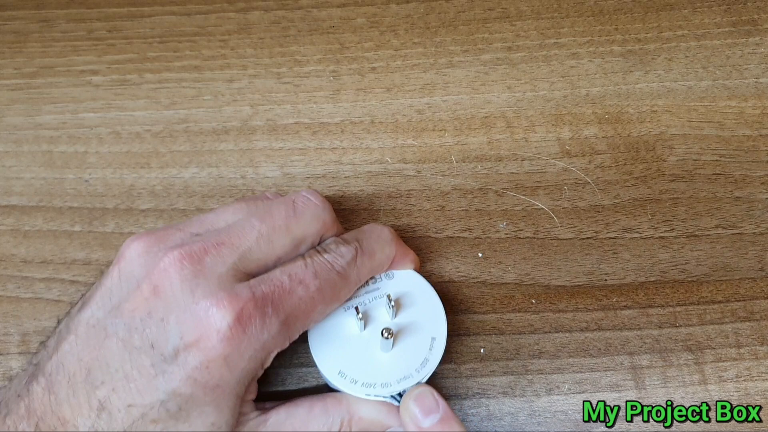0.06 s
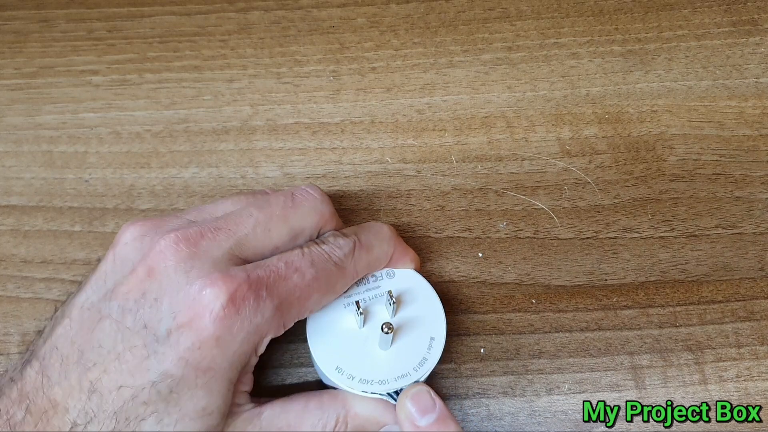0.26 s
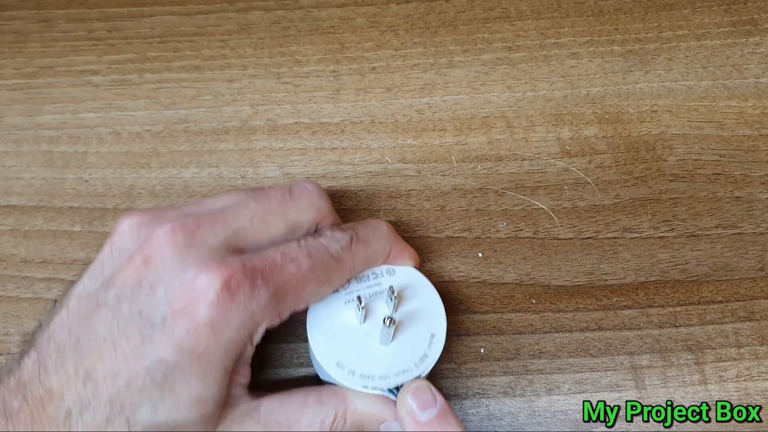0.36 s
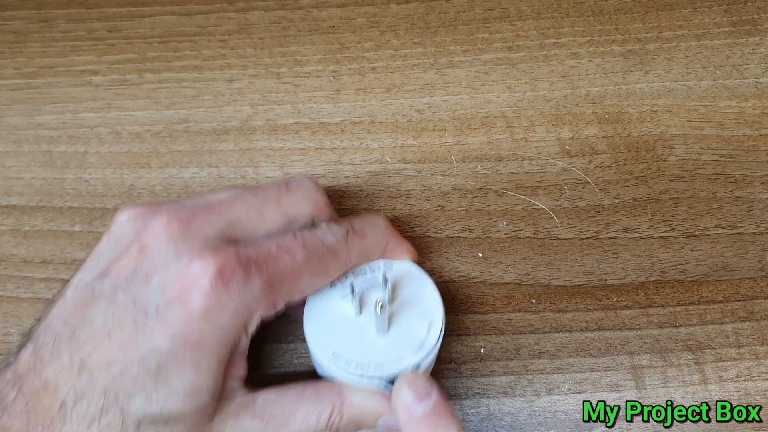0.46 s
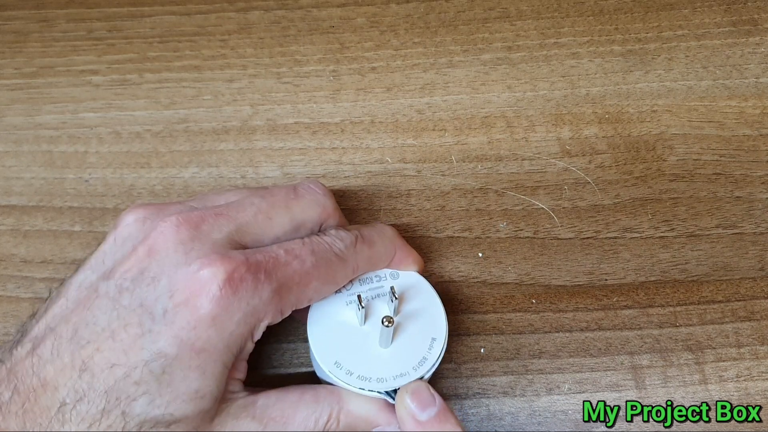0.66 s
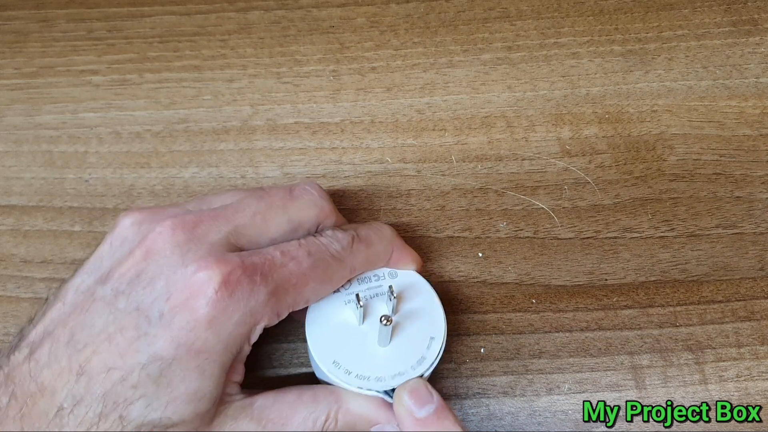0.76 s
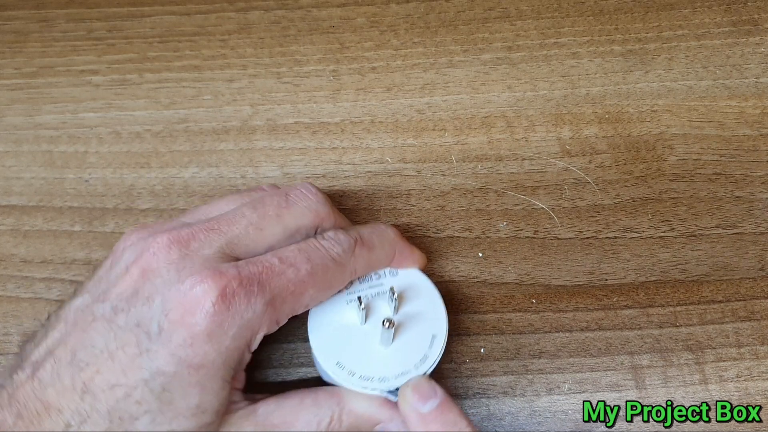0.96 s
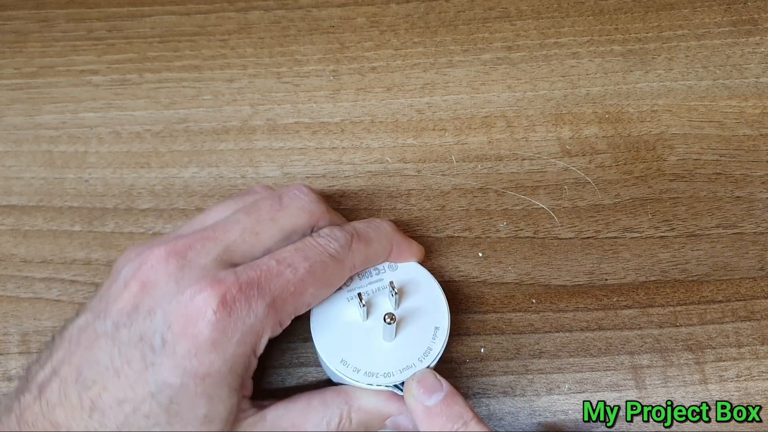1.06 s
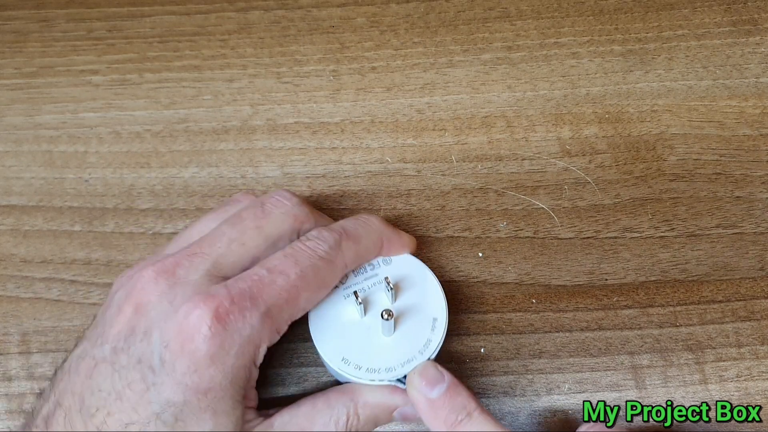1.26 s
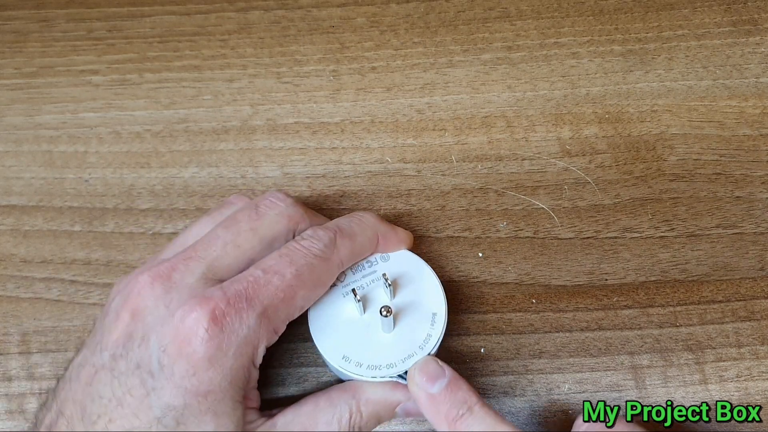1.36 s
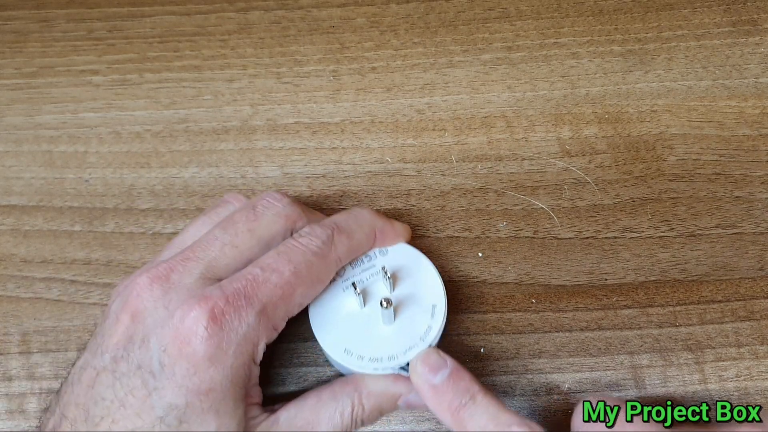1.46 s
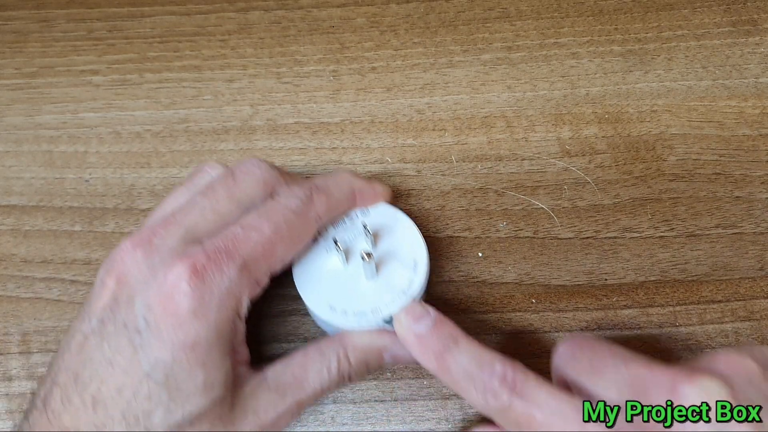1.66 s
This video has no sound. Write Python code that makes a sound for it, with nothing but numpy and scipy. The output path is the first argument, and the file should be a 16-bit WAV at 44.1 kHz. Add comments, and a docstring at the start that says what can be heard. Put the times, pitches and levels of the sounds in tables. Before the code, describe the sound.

Sharp, loud crack of a hard plastic case popping apart, followed by soft clicks and rubbing.

```python
"""Prying open a plastic case

A round plastic case is pried open with a small screwdriver on a wooden desk, in a small live room.
A catch lets go in a quick run of sharp snaps: bursts of noise, coloured by the shell, desk and room.
Then the blade and fingers knock, tick and scrape softly: short filtered bursts, fading tones and noise.
Under it lie a low room rumble and a faint hiss, both made of filtered noise."""
import sys
import numpy as np
from scipy import signal
from scipy.fft import rfft, irfft, next_fast_len
from scipy.io import wavfile
from scipy.ndimage import map_coordinates

SR = 44100
rng = np.random.default_rng(int(sys.argv[2]) if len(sys.argv) > 2 else 0)


def unload_audio(sound):
    """Save the sound as a 16-bit wav file, at the path given as the first command line argument."""
    columns = np.transpose(np.atleast_2d(sound))
    # keep every value between -1 and 1, then stretch to whole-number steps
    steps = np.round(np.clip(columns, -1, 1) * 32767)
    wavfile.write(sys.argv[1], SR, steps.astype(np.int16))


N = 74970
T = np.arange(N) / SR  # time in s
M = next_fast_len(2 * N)  # filter length, with space so that tails do not wrap around
HZ = np.fft.rfftfreq(M, 1 / SR)

# Levels of snaps, clicks and ticks are relative: their functions add level_db. Colours are relative too.
# the catch breaks free: start_s, level_db, bass_cut_hz, tearing_t60_s (t60: time to fade by 60 dB)
SNAP_EVENTS = [(0.2029, 2.5, 465, 0.017), (0.2182, 5, 200.9, 0.02), (.2202, 0, 330, 0.014)]
# broad colour of a snap: pitch_hz, level_db
SNAP_TONE = [(40, -9.5), (150, 0), (240, -5.5), (400, -5), (620, 3), (1000, -1.5), (1400, 6.5), (1650, -8),
             (2200, -1.5), (4500, -0.5), (6800, -3), (9000, -5.5), (11500, -3.5), (15000, -14)]
# resonances of the shell: pitch_hz, width_hz, level_db
SHELL_RESONANCES = [(321, 82, 10), (572, 100, 11.5), (920, 140, 9.5), (1195, 82, 6.5), (2735, 220, 1),
                    (3310, 90, 3), (6600, 320, 1), (7055, 120, 3.5), (11460, 290, -2)]
# desk and room ring on after a snap: pitch_hz, level_db, t60_s
DESK_MODES = [(56, -43, .55), (79, -39, .5), (120, -39, .28), (155, -27, .28), (303, -31, .22),
              (430, -38, .28), (548, -40, .28), (573, -37, .28), (715, -37, .25), (815, -39, .24),
              (891, -37, .22), (958, -33, .25), (1038, -39, .25), (1232, -37, .3)]
# dull knocks of blade and fingers: start_s, click_db, brightness_hz, thud_db, thud_start_hz,
# pitch_rise_share, thud_t60_s, desk_bump_db
KNOCK_EVENTS = [(0.123, -43.5, 464, -58.5, 333, 0.22, 0.1, -41.5),
                (0.4656, -42.5, 1155, -48.5, 330, 0.028, 0.05, -46),
                (0.6686, -45, 3610, -53.5, 337, -0.037, 0.08, -47),
                (0.6998, -22, 2620, -38, 321.5, 0.57, 0.1, -46),
                (0.7718, -37.5, 2860, -56, 348, -0.26, 0.087, -51),
                (0.828, -46, 940, -51.5, 315, 0, 0.054, -44.5),
                (1.202, -31.5, 1220, -37, 519, 0, 0.068, -38.5),
                (1.222, -26, 708, -42, 587.5, -0.233, 0.067, -39),
                (1.338, -34.5, 1610, -51.5, 524.4, 0, 0.25, -59),
                (1.369, -47.5, 820, -60, 462, 0.17, 0.31, -43),
                (1.565, -34.5, 2180, -51, 540, 0.067, 0.18, -51.5),
                (1.577, -38, 2080, -52.5, 661, 0.015, 0.11, -63)]
# colour of the clicks: pitch_hz, level_db
KNOCK_TONE = [(60, -3), (200, 7), (550, 14), (900, 12), (1350, 12.5), (1800, -2), (3000, 3), (12000, -26.5)]
# tones of the held shell: multiple_of_thud_pitch, level_db
THUD_TONES = [(.76, -10), (1, 0), (1.3, -5)]
# the blade taps the rim: start_s, level_db
RIM_TAP_EVENTS = [(1.2035, -57), (1.566, -54), (1.629, -61)]
# ringing of the rim: pitch_hz, level_db, t60_s
RIM_TONES = [(737.5, -2.5, 0.11), (1396, -5, 0.17), (1487, -6.5, 0.13), (2300, -11, 0.081)]
# thin ticks of the blade's tip: start_s, level_db, pitch_hz, t60_s
TICK_EVENTS = [(1.3385, -41, 6260, 0.0079), (1.6633, -35.5, 11560, 0.04)]
# the blade slides in the seam: peak_s, level_db, rise_s, fall_s (each a change of about 17 dB)
SCRAPE_EVENTS = [(1.365, -52, 0.045, 0.12)]
# colour of the scrape: pitch_hz, level_db
SCRAPE_TONE = [(100, -39), (350, 2), (540, 13.5), (900, -2), (1700, -49), (4500, -24), (11000, -26),
               (15000, -60)]
# fingers shift their grip and rub along the shell: time_s, level_db
RUB_LEVELS = [(.88, -80), (1.04, -70), (1.18, -68), (1.3, -66), (1.41, -60.5), (1.51, -67), (1.7, -64.5)]
# colour of the rubbing: pitch_hz, level_db
RUB_TONE = [(100, -13.5), (330, 5), (700, -6), (1050, 2), (1400, -5.5), (1700, -22), (2600, -9),
            (3600, -22.5), (4500, -17), (5600, -28.5), (6600, -16), (8000, -29), (11000, -28), (15000, -49)]
# dull handling noise while the hands work the case: time_s, level_db
GRIP_LEVELS = [(.66, -84), (.68, -64), (.8, -70), (1.0, -69), (1.3, -68), (1.7, -70)]
# colour of the handling noise: pitch_hz, level_db
GRIP_TONE = [(60, -16), (160, -10), (300, -15.5), (480, -14.5), (750, -18.5), (1200, -8), (1650, -14.5),
             (9000, -39.5)]
# level of the low room rumble: time_s, level_db
RUMBLE_LEVELS = [(.35, -55), (.5, -60), (.88, -55.5), (1.0, -64), (1.45, -55.5), (1.7, -62)]
# colour of the rumble: pitch_hz, level_db
RUMBLE_TONE = [(20, -19), (40, -6), (65, 0), (105, -13), (300, -27), (2000, -80)]
# colour of the faint hiss: pitch_hz, level_db
HISS_TONE = [(300, -2.5), (600, -14.5), (2000, -16.5), (15000, -33.5)]
# how long the room rings: pitch_hz, t60_s
ROOM_FADES = [(100, 0.2), (500, 0.29), (1500, 0.28), (4000, 0.27), (8000, 0.27), (14000, 0.16)]
# colour of the room: pitch_hz, level_db
ROOM_TONE = [(60, -1.5), (250, -4), (900, -4.5), (2500, -2), (7000, -5), (14000, 1)]
# how alike noise is on the two sides: pitch_hz, likeness (1 is the same, 0 unrelated)
SIDE_LIKENESS = [(100, .97), (300, .88), (600, .45), (1200, 0), (2500, 0)]

BEFORE_SNAP_S, BEFORE_SNAP_DB = .0015, -26  # a faint short burst of noise just before each snap
KNOCK_WET_DB, THUD_WET_DB = -9, -15  # share of the room
THUD_BEND_S = 0.0214  # the shell stiffens or slackens under the fingers in this time
BUMP_HZ, BUMP_T60_S = 183, 0.056  # the desk under a knock
ECHO_DB = -59.5  # the room still ringing as the scene opens
EARLY_COUNT, EARLY_SPAN_S, EARLY_DB = 14, .014, -8.5  # echoes off the desk, hands and tripod
TAIL_SWELL_S = 0.03  # the tail after a sound swells in over about this time
LEFT_LEAD_S, LEFT_DB = .00006, -0.07  # LEFT_DB: left by this, right by its opposite
TOP_HZ = 15900  # little is kept above this pitch


def snaps(level_db=8, wet_db=-1.0, grit=3):
    """A faint short burst of noise, then a tearing burst through the shell, with an even room tail."""
    power = amp(along(SNAP_TONE)) ** 2
    for hz, width, db in SHELL_RESONANCES:
        power = power + amp(db) ** 2 / (1 + (2 * (HZ - hz) / width) ** 2)
    out = np.zeros((2, N))
    for s, db, cut_hz, t60 in SNAP_EVENTS:
        bass_cut = HZ ** 2 / (HZ ** 2 + cut_hz ** 2)
        colour = amp(db + level_db) * causal(np.sqrt(power) * bass_cut)
        tear = at(s, burst(t60, grit))
        lead_in = amp(BEFORE_SNAP_DB) * at(s - BEFORE_SNAP_S, burst(t60, grit))
        direct = near(filtered(tear + lead_in, colour))
        # the room gathers all directions, so it gets one clean push without the grit
        clean_push = at(s, irfft(colour, M)[:N])
        out += direct + amp(wet_db) * room(clean_push)
    return out


def desk(attack_s=0.00307, spread=.25):
    """The hardest snap jolts the desk; its higher modes reach the two sides out of step."""
    hardest_s = max(SNAP_EVENTS, key=lambda row: row[1])[0]
    ring = np.zeros((2, N))
    for hz, db, t60 in DESK_MODES:
        phase = spread * hz / 500 * rng.standard_normal((2, 1))
        ring += amp(db) * fade(T, t60) * np.sin(2 * np.pi * hz * T + phase)
    return at(hardest_s, ring * (1 - np.exp(-T / attack_s)))


def knocks(level_db=8, grit=1.8, click_t60_s=0.045, attack_s=.002):
    """Soft contacts: a dulled click, a thud of the held shell that bends with the grip, a desk bump."""
    clicks, thuds = np.zeros((2, N)), np.zeros(N)
    for s, db, bright_hz, thud_db, thud_hz, rise, t60, bump_db in KNOCK_EVENTS:
        dulling = np.sqrt(1 + (HZ / bright_hz) ** 6)
        colour = causal(amp(along(KNOCK_TONE)) / dulling)
        clicks += at(s, amp(db + level_db) * filtered(burst(click_t60_s, grit), colour))

        pitch_hz = thud_hz * (1 + rise * (1 - np.exp(-T / THUD_BEND_S)))
        cycles = np.cumsum(pitch_hz) / SR
        thud = np.zeros(N)
        for multiple, mode_db in THUD_TONES:
            thud += amp(thud_db + mode_db) * np.sin(2 * np.pi * (multiple * cycles + rng.random()))

        bump_hz = BUMP_HZ * np.exp(rng.normal(0, 0.063))  # a little different each time
        bump = amp(bump_db) * np.sin(2 * np.pi * bump_hz * T)
        body = thud * fade(T, t60) + bump * fade(T, BUMP_T60_S)
        thuds += at(s, body * (1 - np.exp(-T / attack_s)))
    return in_room(clicks, KNOCK_WET_DB) + in_room(thuds, THUD_WET_DB)


def rim():
    """Each tap rings the same few modes of the loosened rim."""
    ring = np.zeros(N)
    for s, db in RIM_TAP_EVENTS:
        for hz, mode_db, t60 in RIM_TONES:
            ring += at(s, amp(db + mode_db) * fade(T, t60) * np.sin(2 * np.pi * hz * T))
    return in_room(ring, KNOCK_WET_DB)


def ticks(level_db=8, width=0.11, wet_db=-2):
    """The steel tip catches on the rim: a burst through a narrow peak around one pitch."""
    out = np.zeros((2, N))
    for s, db, hz, t60 in TICK_EVENTS:
        peak = 1 / np.hypot(1, (HZ / hz - 1) / width)
        bass_cut = HZ / (HZ + hz) * 2
        out += at(s, amp(db + level_db) * filtered(burst(t60, grit=5.6), causal(bass_cut * peak)))
    return in_room(out, wet_db)


def scrapes(rough_db=2, slips_per_s=160):
    """The sliding blade makes uneven friction noise that swells and dies away."""
    stroke = np.zeros(N)
    for s, db, rise, fall in SCRAPE_EVENTS:
        stroke += amp(db) * np.exp(-np.maximum((s - T) / rise, (T - s) / fall) * 2)
    return stroke * unit(diffuse(SCRAPE_TONE) * amp(rough_db * wobble(slips_per_s)))


def rub(levels, colour, rough_db, slips_per_s):
    """Skin shifts and slides on smooth plastic: noise with an uneven level."""
    level_db = np.interp(T, *np.transpose(levels), left=-120)  # almost silent before the first point
    return amp(level_db) * unit(diffuse(colour) * amp(rough_db * wobble(slips_per_s)))


def background(echo_t60=0.24, hiss_db=-76):
    """A rumble that swells and sinks, a steady faint hiss, and the end of a bright echo in the room."""
    echo_tone = [(200, 3.5), (1200, 3.5), (2000, -1.5), (11000, -0.5), (15000, -14.0)]  # pitch_hz, level_db
    echo = diffuse(echo_tone) * fade(T, echo_t60)
    rumble = amp(np.interp(T, *np.transpose(RUMBLE_LEVELS))) * diffuse(RUMBLE_TONE)
    return rumble + amp(hiss_db) * diffuse(HISS_TONE) + amp(ECHO_DB) * echo


def in_room(x, wet_db):
    """A sound on the desk with its share of the room."""
    return near(x) + amp(wet_db) * room(x)


def near(x):
    """The direct sound, reaching the left side slightly first, and a few near echoes."""
    delays = (.002 + EARLY_SPAN_S * rng.random((2, EARLY_COUNT))) * SR
    early = [np.bincount(d.astype(int), rng.choice([-1, 1], EARLY_COUNT), N) for d in delays]
    early = np.array(early) / np.sqrt(EARLY_COUNT)
    sides = np.array([[1], [-1]])  # left, right
    direct = np.exp(1j * np.pi * HZ * LEFT_LEAD_S * sides)
    echoes = amp(EARLY_DB) * rfft(early, M) * HZ / (HZ + 400)  # thinner in the bass
    return amp(LEFT_DB * sides) * filtered(x, direct + echoes)


def room(x):
    """The tail after a sound swells in over about 30 ms, as if a limiter recovers, then dies."""
    hz, t, z = signal.stft(diffuse([(100, 0.008), (10000, 0.0067)]), SR, nperseg=256)
    z = z * fade(t, along(ROOM_FADES, hz)[:, None])  # each pitch dies at its own speed
    tail = signal.istft(z, SR, nperseg=256)[1][:, :N]
    swell = 1 - np.exp(-(T / TAIL_SWELL_S) ** 2)
    tail = unit(tail * swell) / np.sqrt(N)
    return filtered(x, amp(along(ROOM_TONE)) * rfft(tail, M))


def burst(t60, grit):
    """A contact of about unit energy: one push, and dying grit that scatters differently to each side."""
    x = diffuse([(100, 0.003), (10000, 0.0059)]) * fade(T, t60)
    x = grit * x / np.sqrt(np.sum(x ** 2) / 2)
    x[:, 0] += 1  # the push
    return x / np.sqrt(1 + grit ** 2)


def diffuse(colour):
    """Stereo noise, alike in the bass and unrelated in the treble."""
    turn = np.arccos(np.clip(along(SIDE_LIKENESS), -1, 1)) / 2
    shares = np.array([np.cos(turn), np.sin(turn)])
    mid, side = filtered(rng.standard_normal((2, N)), amp(along(colour)) * shares)
    return unit(np.array([mid + side, mid - side]))


def wobble(rate):
    """A smooth curve through random points, rate points a second."""
    return map_coordinates(rng.standard_normal(N // 10), [T * rate], mode="wrap")


def amp(db):
    """Decibels to gain."""
    return 10 ** (np.asarray(db) / 20)


def unit(x):
    """Scale to an rms (average strength) of 1."""
    return x / np.sqrt(np.mean(x ** 2) + 1e-20)


def along(points, hz=HZ):
    """Read a curve of (pitch_hz, value) points on a log pitch axis."""
    f, v = np.transpose(points)
    return np.interp(np.log(hz + 1), np.log(f + 1), v)


def fade(t, t60):
    """Exponential decay, by 60 dB in t60 seconds."""
    return np.exp(-np.log(1000) * t / t60)


def filtered(x, response):
    """x shaped by a frequency response."""
    return irfft(rfft(x, M) * response, M)[..., :N]


def causal(gain):
    """The minimum-phase response with this gain: it rings only after a push, never before."""
    c = irfft(np.log(np.maximum(gain, 1e-6)), M)
    c[1:M // 2] *= 2
    c[M // 2 + 1:] = 0
    return np.exp(rfft(c))


def at(s, x):
    """x delayed to start at s seconds."""
    delay = max(round(s * SR), 0)
    return np.pad(x, [(0, 0)] * (x.ndim - 1) + [(delay, 0)])[..., :N]


def scene():
    """All sounds at the microphone pair."""
    hands = rub(RUB_LEVELS, RUB_TONE, rough_db=1.0, slips_per_s=31)
    hands = hands + rub(GRIP_LEVELS, GRIP_TONE, rough_db=1.5, slips_per_s=50)
    return snaps() + desk() + knocks() + rim() + ticks() + scrapes() + hands + background()


def record(dry):
    """The recorder rounds off the highest peaks and cuts steeply above its band limit."""
    rounded = dry / (1 + np.abs(dry / .8) ** 6) ** (1 / 6)
    return filtered(rounded, causal(1 / np.sqrt(1 + (HZ / TOP_HZ) ** 240)))


dry = scene()
out = record(dry)
unload_audio(out)
```